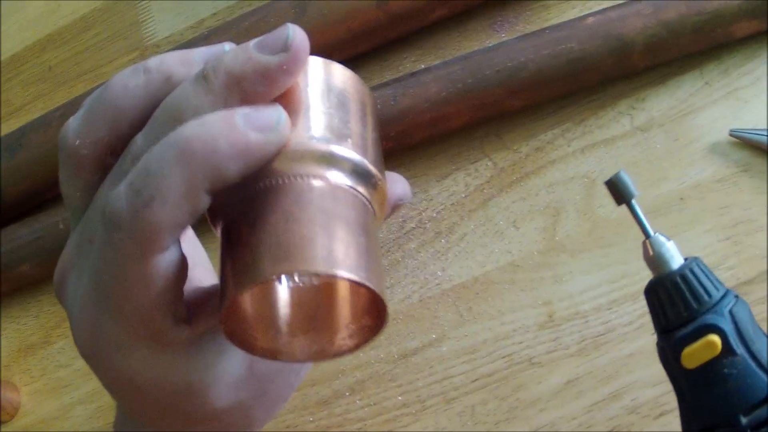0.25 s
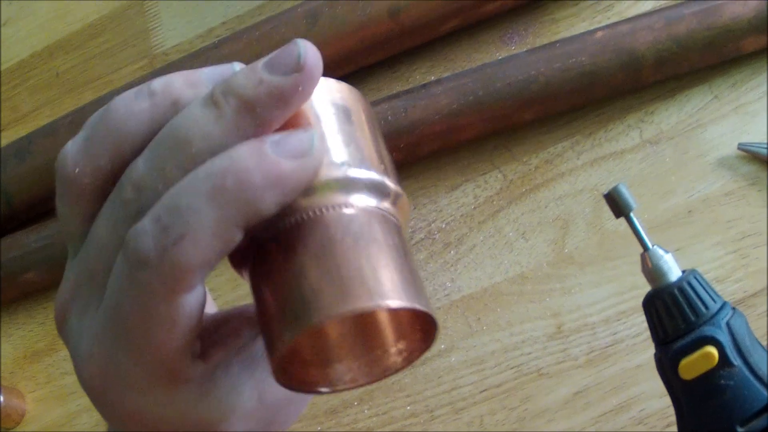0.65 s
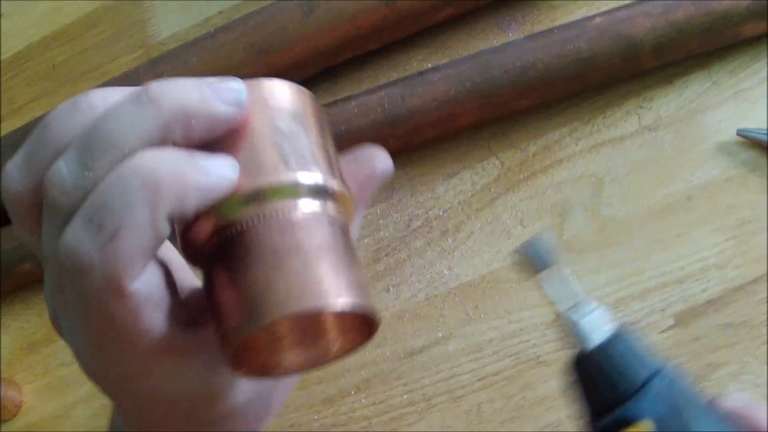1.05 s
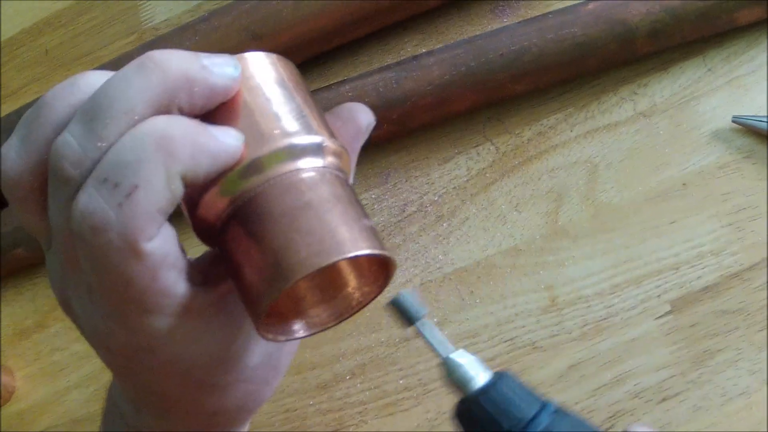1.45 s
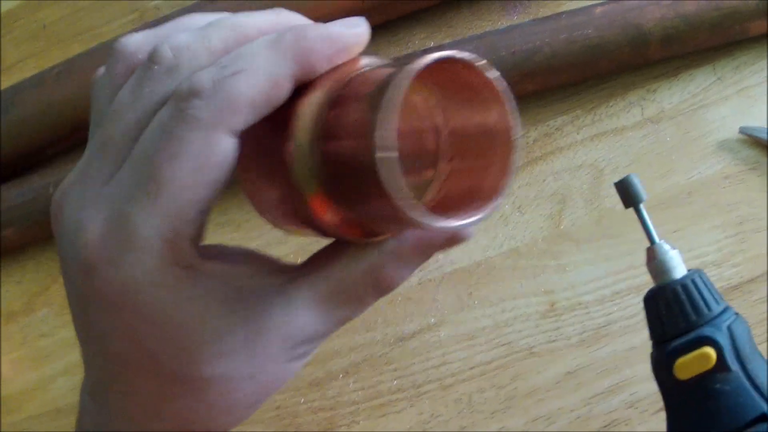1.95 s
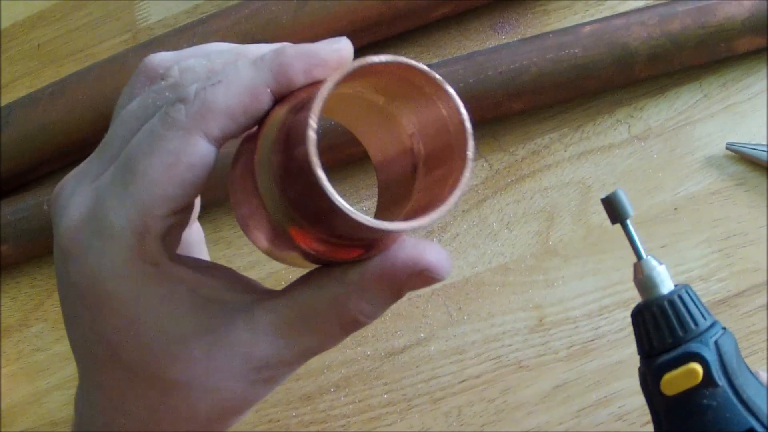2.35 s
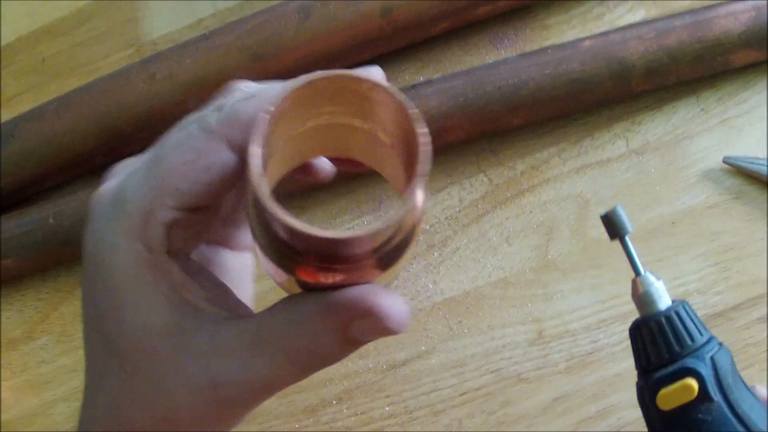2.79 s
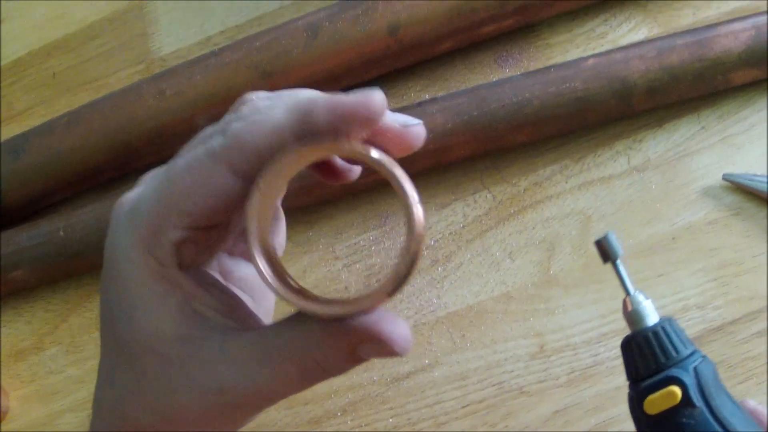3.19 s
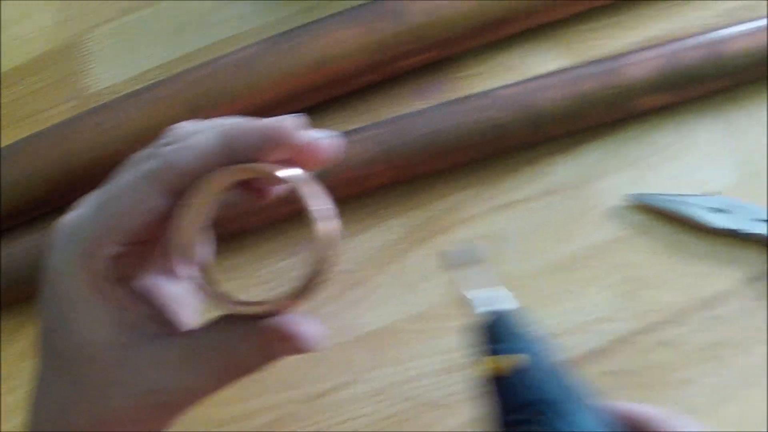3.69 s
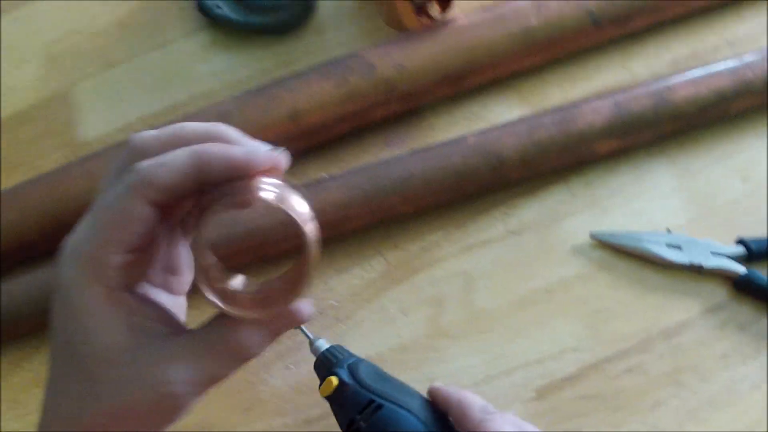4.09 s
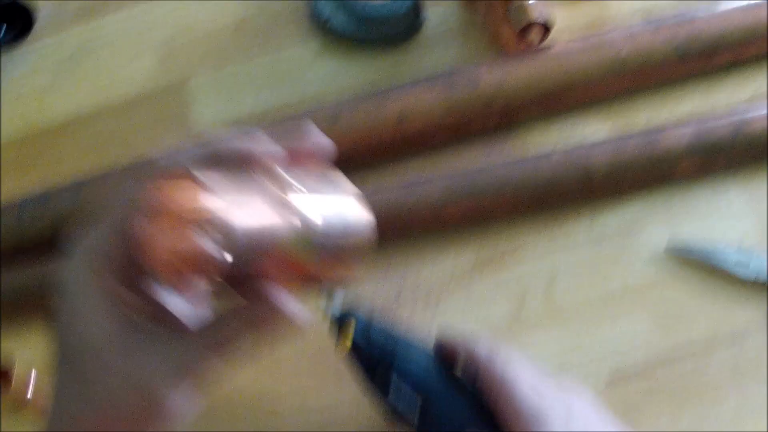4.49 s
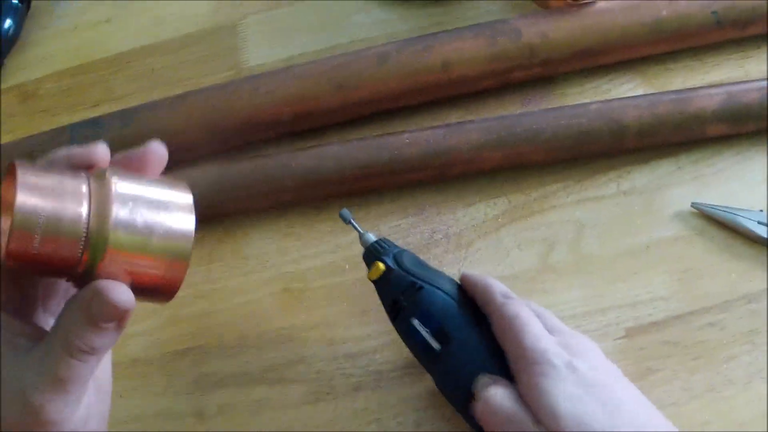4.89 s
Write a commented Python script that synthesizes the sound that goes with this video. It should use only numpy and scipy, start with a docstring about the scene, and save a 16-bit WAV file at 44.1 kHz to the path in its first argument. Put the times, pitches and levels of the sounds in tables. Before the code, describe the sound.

A handheld rotary tool whines and buzzes as it gathers speed, surges briefly at switch-off, then coasts down in pitch with faint taps.

```python
"""A handheld rotary tool gathers speed over a workbench, is switched off after three seconds and coasts down.
From the start the shaft's imbalance hums, the fan whines, the rotor buzzes through the housing and air and
brushes hiss; the level dips briefly and hands shift their grip. The buzz surges at switch-off and a bearing
sings; late in the coast, fingers tap the housing. Shaft multiples make the tones, shaped noise the rest.
The recorder samples slowly and holds each sample, which mirrors the whole sound into the treble."""
import sys
import numpy as np
from scipy import signal
from scipy.fft import rfft, irfft
from scipy.io import wavfile

SR = 44100
rng = np.random.default_rng(int(sys.argv[2]) if len(sys.argv) > 2 else 0)


def master(y):
    """Save y as 16-bit WAV."""
    cut = np.clip(np.atleast_2d(y).T, -1, 1)
    pcm = np.round(cut * 32767)  # scale
    wavfile.write(sys.argv[1], SR, pcm.astype(np.int16))


N = 226629
TIME = np.arange(N) / SR  # seconds


def gain_of(db):
    """Logarithmic level: decibels to amplitude."""
    return 10 ** (np.asarray(db) / 20)


def evened(x):
    """Normalization: scales to rms 1."""
    return x / np.sqrt(np.mean(x ** 2) + 1e-20)


def curves(rows):
    """Linear interpolation: each column of a table as a curve over time."""
    s, *columns = np.transpose(rows)
    return [np.interp(TIME, s, column) for column in columns]


def bump(centre_s, half_s):
    """Gaussian envelope: 1 at its centre, 1/e at the half length."""
    return np.exp(-((TIME - centre_s) / half_s) ** 2)


def filtered(x, gain):
    """Linear filtering: multiplies the spectrum by a gain given as a function of frequency."""
    spectrum = rfft(x, 2 * N)  # zero padding keeps the end from wrapping to the start
    return irfft(spectrum * gain(np.fft.rfftfreq(2 * N, 1 / SR)))[:N]


def noise(points):
    """Spectral shaping: white noise given the listed spectrum, rms 1."""
    hz, db = np.transpose(points)

    def colour(f):
        return gain_of(np.interp(np.log(f + 1), np.log(hz), db))
    return evened(filtered(rng.standard_normal(N), colour))


def drift(rate_hz):
    """Low-pass random process: slow chance of rms 1."""
    return evened(filtered(rng.standard_normal(N), lambda f: np.exp(-(f / rate_hz) ** 2)))


def partial(angle, order):
    """Harmonic synthesis: one multiple of a rotation at a random phase, rms 1."""
    phase = 2 * np.pi * rng.random()
    return np.sqrt(2) * np.cos(order * angle + phase)


def fading(depth, rate_hz):
    """Interference: a partial swells and fades as the tool moves among the bench's reflections."""
    return evened(1 + depth * drift(rate_hz))


OFF_S = 3.16  # the switch opens


def powered():
    """Drive gate: one under power, falling to zero in the last 50 ms before the switch opens."""
    return np.clip((OFF_S - TIME) * 20, 0, 1)


MAINS_PULSE_HZ = 119.9


def mains_angle():
    """Pulsating torque: the motor is pushed twice in each mains cycle."""
    return 2 * np.pi * MAINS_PULSE_HZ * TIME


def mains(depth):
    """Amplitude modulation: a throb in step with the mains pushes while powered."""
    return 1 + depth * powered() * np.cos(mains_angle())


# the rotor chatters while it gathers speed, then calms: (time [s], added buzz level [dB], looseness [0-1])
CHATTER_COURSE = [(0, 3.5, 0), (.25, 6.5, 0), (.42, 11, 1), (.7, 12.5, 1), (1, 14.5, 0.25),
                  (1.25, 11.5, 0.42), (1.5, 10, .1), (1.8, 5.5, 0.06), (2.15, 3, 0.06)]


def chatter():
    """Play in the rotor: the added buzz level in dB and the looseness over time."""
    return curves(CHATTER_COURSE)


# the shaft under power: (time [s], shaft speed [Hz])
DRIVEN_SPEED = [(0, 371.5), (.16, 383.3), (.48, 397.7), (.8, 406), (1.28, 414.6), (1.88, 420.5),
                (2.15, 425.8), (3.05, 433.3)]
# speed at switch-off; braking by friction; speed at which the fan's drag brakes as much as friction
TOP_HZ, FRICTION_HZ_PER_S, DRAG_HZ = 433.3, 114.85, 571


def speed():
    """Rotational dynamics: the run-up, then coasting against steady friction and square-law fan drag."""
    driven_hz, = curves(DRIVEN_SPEED)
    start_angle = np.arctan(TOP_HZ / DRAG_HZ)
    coasting_hz = DRAG_HZ * np.tan(start_angle - (TIME - OFF_S) * FRICTION_HZ_PER_S / DRAG_HZ)
    return np.where(TIME < OFF_S, driven_hz, coasting_hz)


def with_speed(top_db, slope_db):
    """Power law: a level that rises by slope_db per tenfold shaft speed."""
    return top_db + slope_db * np.log10(speed() / TOP_HZ)


RIPPLE, LOOSE_RIPPLE = .05, .035  # radians; the second is added at full looseness


def rotation():
    """Phase modulation: each push ripples the shaft's angle, giving the higher orders sidebands."""
    _, loose = chatter()
    unsteady_hz = speed() * (1 + 0.000546 * drift(rate_hz=19.0))
    angle = 2 * np.pi * np.cumsum(unsteady_hz) / SR
    ripple = (RIPPLE + loose * LOOSE_RIPPLE) * powered()
    return angle + ripple * np.sin(mains_angle() + np.pi / 4)


def resonate(drive, hz, width):
    """Resonance: peak gain 1, in full swing at the start; it lags and beats when the drive sweeps past."""
    pole = np.exp((-np.pi * width + 2j * np.pi * hz) / SR)
    gain = 1 - abs(pole)
    swing = gain * drive[0] / (drive[1] / drive[0] - pole)  # steady state at the starting speed
    return signal.lfilter([gain], [1, -pole], drive, zi=[pole * swing])[0].real


# the hum's brief swells and dips: (time [s], half length [s], level change [dB])
HUM_WAVERS = [(0, 0.044, 5.5), (0.174, 0.039, -3), (3.22, .05, 4), (3.331, 0.014, -12.5),
              (3.48, 0.085, -5.5), (3.698, .06, 3), (4.56, 0.098, -7)]


def wavering():
    """Amplitude fluctuation: the hum's brief swells and dips, in dB."""
    return sum(db * bump(s, half) for s, half, db in HUM_WAVERS)


# resonances of housing and bench: (centre [Hz], width [Hz], level before weighting [dB], signed weight)
HUM_RESONANCES = [(433.9, 3.4, -48.5, 1), (417.73, 10, -33, 0.99), (412.7, 16.3, -37.5, -0.98),
                  (387.7, 5.4, -40, -1.06), (371.4, 7.4, -41.5, -0.84), (332.2, 93, -37.5, -0.94),
                  (251, 11.6, -34, -1.02)]
# drive at top speed, its rise in dB per tenfold speed, and its change with the drive off
HUM_DB, HUM_SLOPE_DB, HUM_COAST_DB = -1, 122, -0.8


def hum(angle):
    """Forced vibration: imbalance shakes the resonances once a turn; the field coils hum while powered."""
    level_db = with_speed(HUM_DB, HUM_SLOPE_DB) + HUM_COAST_DB * (1 - powered())
    force = np.sqrt(2) * gain_of(level_db) * np.exp(1j * angle)
    shake = np.zeros(N)
    for hz, width, db, weight in HUM_RESONANCES:
        shake += weight * gain_of(db) * resonate(force, hz, width)
    coils = gain_of(-72.5) * powered() * partial(mains_angle(), order=2)
    return shake * gain_of(wavering()) * mains(depth=0.076) + coils


# the hum's second harmonic: (time [s], level [dB])
SECOND_HARMONIC = [(0, -59.5), (.18, -69.5), (.62, -75), (.83, -61), (2, -59.5), (2.35, -68.5), (4, -67.5),
                   (4.25, -77), (5.14, -99)]
# the hum's third harmonic: (time [s], level [dB])
THIRD_HARMONIC = [(0, -68.5), (.9, -50.5), (1.25, -52), (1.82, -68), (2, -59.5), (3.25, -59.5), (3.42, -75),
                  (5.14, -90)]
# the fan's blade tone: (time [s], level [dB])
FAN_TONE = [(0, -57), (.33, -53), (.57, -61.5), (.83, -51.5), (1.16, -56), (1.42, -48.5), (1.7, -52.5),
            (2.2, -48.5), (2.88, -53.5), (3.28, -50), (3.46, -60.5), (3.9, -65), (4.38, -72), (4.6, -83),
            (5.14, -100)]


def whine(angle):
    """Blade passing: eight fan blades, throbbing more when the rotor is loose; imbalance adds overtones."""
    _, loose = chatter()
    (second_db,), (third_db,), (fan_db,) = curves(SECOND_HARMONIC), curves(THIRD_HARMONIC), curves(FAN_TONE)
    second = gain_of(second_db) * partial(angle, order=2)
    third = gain_of(third_db) * partial(angle, order=3)
    throb = mains(depth=np.minimum(0.1 + 2.2 * loose, .9))
    return second + third + gain_of(fan_db) * partial(angle, order=8) * throb


# the buzz surges at switch-off, then swells and dips while coasting:
# (time [s], half length [s], buzz level change [dB])
BUZZ_CHANGES = [(3.276, 0.058, 11), (3.848, 0.13, 2), (4.28, 0.092, -3)]


def buzz_changes():
    """Flat-topped envelope: each change of buzz level comes quickly, holds and stops; in dB."""
    return sum(db * np.exp(-((TIME - s) / half) ** 4) for s, half, db in BUZZ_CHANGES)


# the rotor's partials:
# (multiple of shaft speed, level running true [dB], level chattering [dB], level coasting [dB])
ROTOR_PARTIALS = [(4, -2, 3, -6), (5, -3, 1, -6), (6, -2, -7, 2), (7, 1, -2, -2), (9, 0, 3, 2),
                  (10, -6, 0, -1), (11, -5, 3, -4), (12, -1, -4, -4), (13, -6, -8, -4), (17, -12, -12, -5)]
# how well the housing radiates them: (frequency [Hz], gain [dB])
HOUSING_RADIATION = [(300, -14), (600, -2), (850, -11), (1250, 1.5), (1700, -4.5), (2100, 0.5), (2500, 0.5),
                     (3700, 0.5), (4200, -4), (4800, -3.5), (5300, -8.5), (6000, -3)]
# base level at top speed, its rise in dB per tenfold speed, and its change with the drive off
BUZZ_DB, BUZZ_SLOPE_DB, BUZZ_COAST_DB = -66.5, 53, -1.5


def buzz(angle):
    """Source and filter: rotor partials slide through the housing's fixed colour; power-off changes the mix."""
    speed_hz, on = speed(), powered()
    chatter_db, loose = chatter()
    buzz_db = with_speed(BUZZ_DB, BUZZ_SLOPE_DB) + chatter_db + buzz_changes() + BUZZ_COAST_DB * (1 - on)
    out = np.zeros(N)
    for order, true_db, loose_db, coast_db in ROTOR_PARTIALS:
        driven_db = true_db + loose * (loose_db - true_db)
        force_db = on * driven_db + (1 - on) * coast_db
        housing_db = np.interp(order * speed_hz, *np.transpose(HOUSING_RADIATION))
        tone = partial(angle, order=round(order)) * fading(depth=0.33, rate_hz=5.1)
        out += gain_of(buzz_db + force_db + housing_db) * tone
    return out


# colour of the brush hiss: (frequency [Hz], relative density [dB])
HISS_COLOUR = [(300, -33), (1500, -16), (1850, -6), (2130, 1.5), (2600, -3.5), (3000, 0), (3400, 0.5),
               (3800, -3), (4200, -4.5), (4750, 0), (5100, -5), (5500, -12.5), (6000, -14.5)]


def gritty_noise():
    """Friction noise: the brushes' hiss, whose colour also serves the finger taps."""
    return noise(HISS_COLOUR)


# colour of the fan air: (frequency [Hz], relative density [dB])
AIR_COLOUR = [(30, -27), (150, -16), (220, -9.5), (300, -0.5), (480, 6), (620, 4.5), (740, -2.5),
              (950, -2.5), (1250, 3), (1500, -2), (2000, -4), (3000, -36), (6000, -50)]
# colour of the sparking at the commutator: (frequency [Hz], relative density [dB])
SPARK_COLOUR = [(1000, -31), (2300, -11), (2900, 6.5), (3300, 5.5), (3700, -4), (4300, -21), (6000, -51)]
# base levels at top speed and rise in dB per tenfold speed; the share of the chatter's added dB each follows
AIR_DB, AIR_SLOPE_DB, AIR_SHARE = -57, 53.5, 0.28
HISS_DB, HISS_SLOPE_DB, HISS_SHARE = -54.5, 7, .22
# the hiss fades below this shaft speed; steepness is an exponent
HISS_KNEE_HZ, HISS_STEEPNESS = 216, 6.3
SPARK_DB = -5  # relative to the brush hiss


def rush(angle):
    """Turbulence and friction: fan air, and brushes that scrape once a turn when loose and spark if powered."""
    chatter_db, loose = chatter()
    air_db = with_speed(AIR_DB, AIR_SLOPE_DB) + AIR_SHARE * chatter_db
    knee_db = 10 * np.log10(1 + (HISS_KNEE_HZ / speed()) ** HISS_STEEPNESS)
    hiss_db = with_speed(HISS_DB, HISS_SLOPE_DB) + HISS_SHARE * chatter_db - knee_db
    air = gain_of(air_db) * noise(AIR_COLOUR)
    scrape = evened((1 + .5 * loose * np.cos(angle)) * gain_of(1.2 * drift(rate_hz=19)))
    sparks = gain_of(SPARK_DB) * powered() * mains(depth=0.22) * noise(SPARK_COLOUR)
    return air + gain_of(hiss_db) * scrape * (gritty_noise() + sparks)


# colour of the quiet workshop: (frequency [Hz], relative density [dB])
ROOM_COLOUR = [(20, -4), (120, -6.5), (220, -5), (330, -0.5), (620, 1.5), (800, -14), (1250, -14),
               (1650, -11), (2100, -9.5), (2600, -6.5), (3300, -10), (6000, -35)]
ROOM_DB = -67


def workshop():
    """Ambient noise: the steady, quiet background of the room."""
    return gain_of(ROOM_DB) * noise(ROOM_COLOUR)


# the level dips briefly: (time [s], half length [s], tone level change [dB], hiss level change [dB])
LEVEL_DIPS = [(1.205, .014, -3, -12), (1.436, .009, -1, -14)]


def dips():
    """Gain modulation: brief dips, one gain for the tones and one for air and brushes."""
    shapes = np.array([bump(s, half) for s, half, _, _ in LEVEL_DIPS])
    depths_db = np.array(LEVEL_DIPS)[:, 2:].T
    return gain_of(depths_db @ shapes)


# hands shift their grip: (time [s], half length [s], level [dB], centre [Hz])
GRIP_SHIFTS = [(1.525, 0.24, -74, 81.5), (5.08, 0.11, -69.5, 312)]


def grips():
    """Sliding friction: soft skin makes a short swell of low noise."""
    out = np.zeros(N)
    for s, half, db, hz in GRIP_SHIFTS:
        skin = noise([(hz / 10, -10), (hz / 2, -8), (hz, 0), (hz * 2, -14), (hz * 10, -60)])
        out += gain_of(db) * bump(s, half) * skin
    return out


# the coasting bearing's songs:
# (start time [s], full time [s], release time [s], multiple of shaft speed, level when full [dB])
BEARING_SONGS = [(3.35, 4.0, 4.88, 16, -56.8), (4.9, 5.0, 5.14, 21.33, -69), (4.93, 5.02, 5.14, 28.45, -68)]
# climb from start to full, sag after full, further fall after release
SONG_RISE_DB, SONG_SAG_DB_PER_S, SONG_RELEASE_DB_PER_S = 16.5, 4.5, 140


def bearing(angle):
    """Undriven rolling: the bearing sings and flutters, slipping a little; each song swells, then sags."""
    slipping = angle + .035 * drift(rate_hz=70)  # radians
    out = np.zeros(N)
    for start, full, release, order, db in BEARING_SONGS:
        rise_db = SONG_RISE_DB * np.minimum((TIME - full) / (full - start), 0)
        sag_db = SONG_SAG_DB_PER_S * np.maximum(TIME - full, 0)
        release_db = SONG_RELEASE_DB_PER_S * np.maximum(TIME - release, 0)
        level = gain_of(db + rise_db - sag_db - release_db)
        out += (TIME > start) * level * partial(slipping, order=order)
    return out * fading(depth=.36, rate_hz=70)


# fingers tap the plastic housing: (time [s], level before the mix of crack and ring [dB])
FINGER_TAPS = [(4.750, -40.5), (4.776, -48), (4.989, -52)]
# what the housing rings with: (frequency [Hz], relative level [dB], time to fall 60 dB [s])
HOUSING_RINGS = [(2450, -8, .02), (3150, -3, .02), (3800, -4, .018), (4250, -2, .018), (4700, 0, .06)]


def taps():
    """Impulse response: each tap is a short gritty crack that rings the housing for a moment."""
    out = np.zeros(N)
    for s, db in FINGER_TAPS:
        age = np.maximum(TIME - s, 0)
        ring = np.zeros(N)
        for hz, mode_db, t60 in HOUSING_RINGS:
            ring += gain_of(mode_db - 60 * age / t60) * np.sin(2 * np.pi * hz * age)
        crack = .35 * (age > 0) * np.exp(-age / .004) * gritty_noise()
        out += gain_of(db) * (crack + .8 * ring / abs(ring).max())
    return out


def scene():
    """Superposition: one slightly unsteady shaft drives every part of the tool; hands and room are added."""
    angle = rotation()
    tone_gain, hiss_gain = dips()
    tones = hum(angle) + whine(angle) + buzz(angle) + bearing(angle)
    tool = tone_gain * tones + hiss_gain * rush(angle)
    return (tool + workshop() + grips() + taps())[None]


HOLD_HZ, EDGE_HZ = 12000, 15350  # sampling rate of the hold; upper band limit


def record(dry):
    """Sample and hold: mirror images either side of the rate under a sinc slope; then the band limit."""
    band = filtered(dry[0], lambda f: f < HOLD_HZ / 2)
    sampled = band * (1 + 2 * np.cos(2 * np.pi * HOLD_HZ * TIME))
    held = filtered(sampled, lambda f: np.sinc(f / HOLD_HZ))
    band_limit = signal.firwin(1023, EDGE_HZ, window=("kaiser", 9), fs=SR)
    return signal.oaconvolve(held, band_limit, "same")[None]


dry = scene()
out = record(dry)
master(out)
```